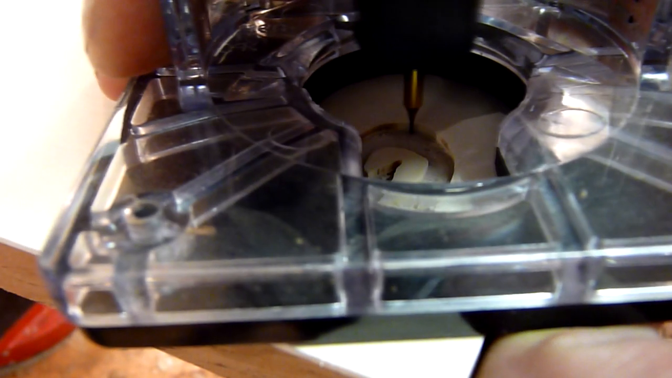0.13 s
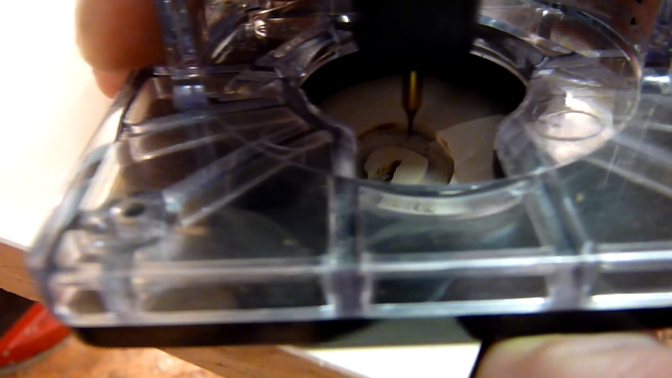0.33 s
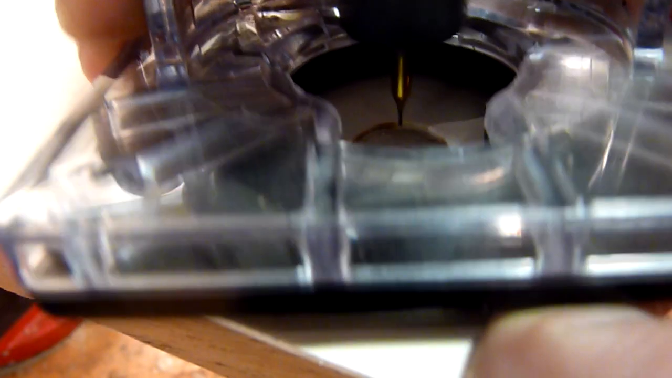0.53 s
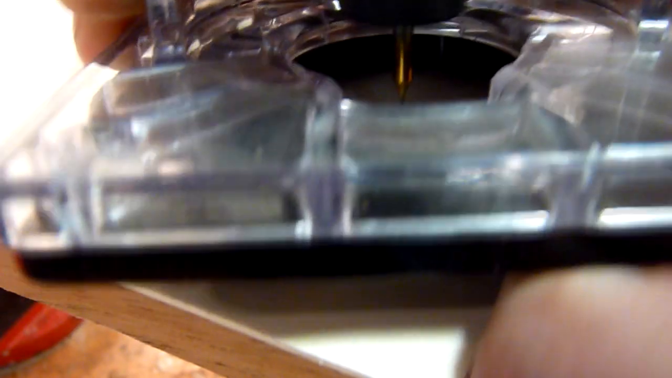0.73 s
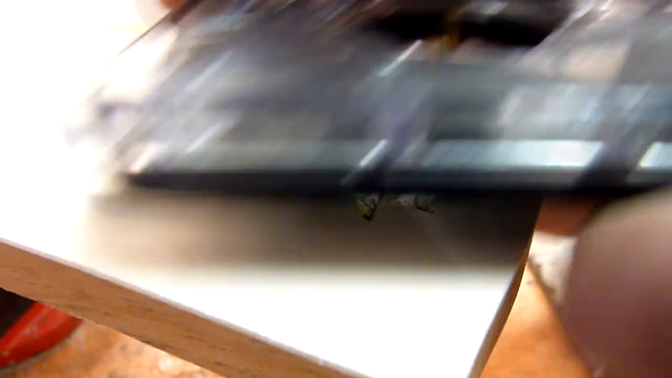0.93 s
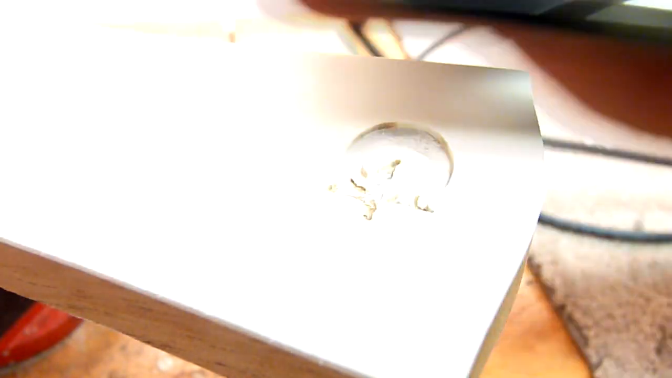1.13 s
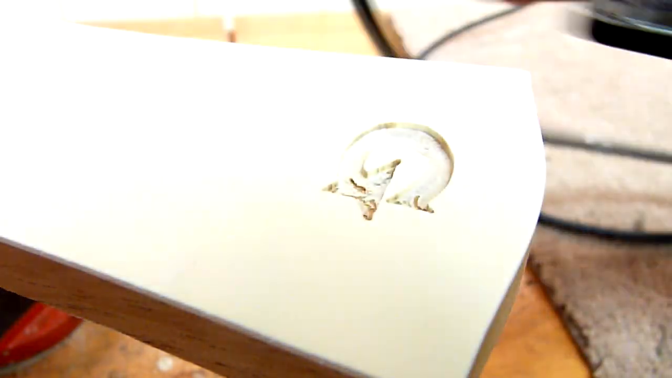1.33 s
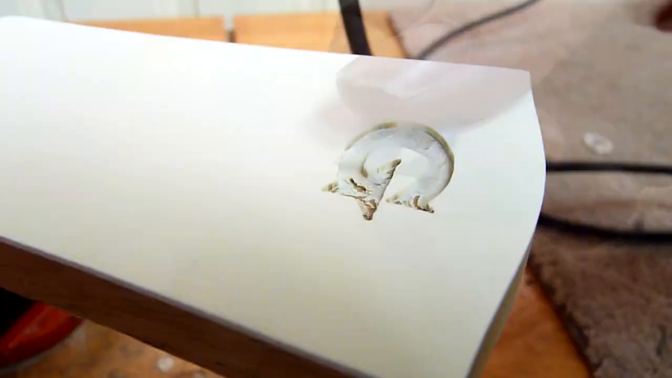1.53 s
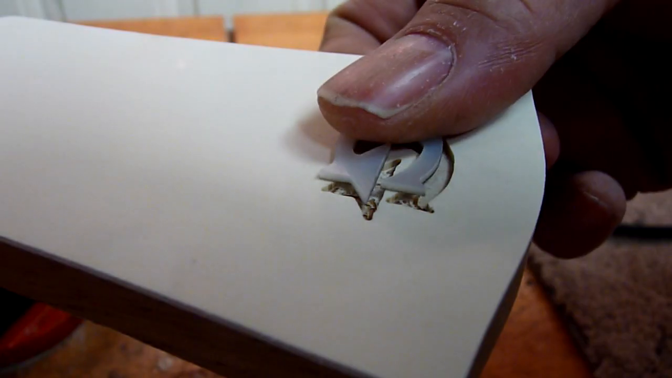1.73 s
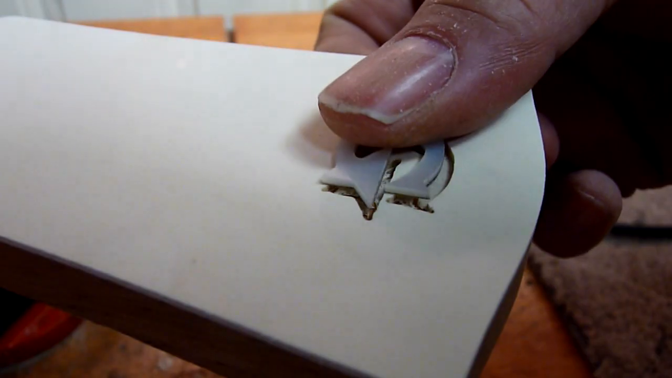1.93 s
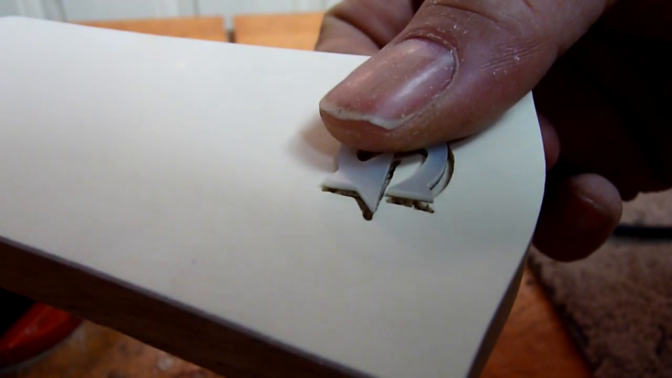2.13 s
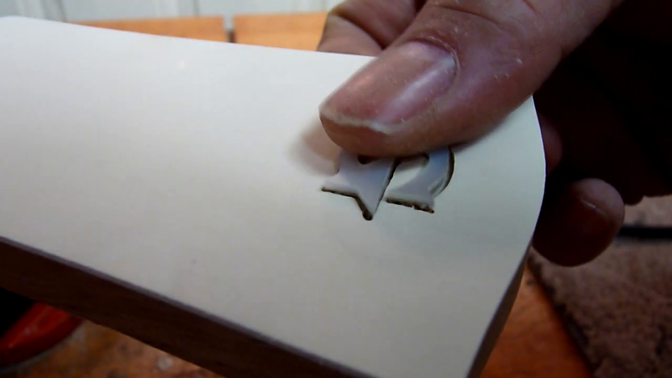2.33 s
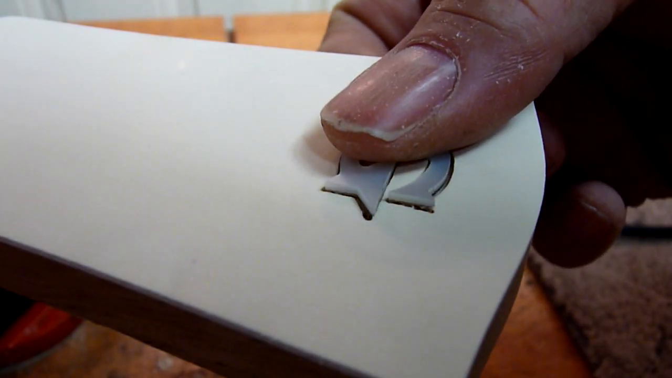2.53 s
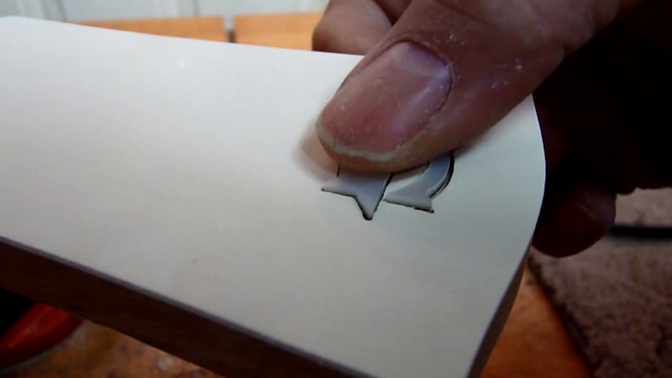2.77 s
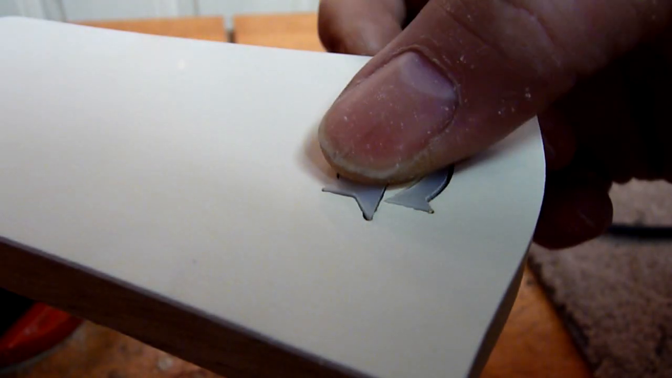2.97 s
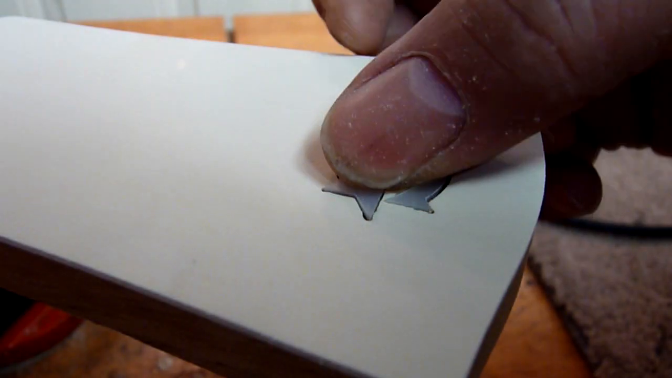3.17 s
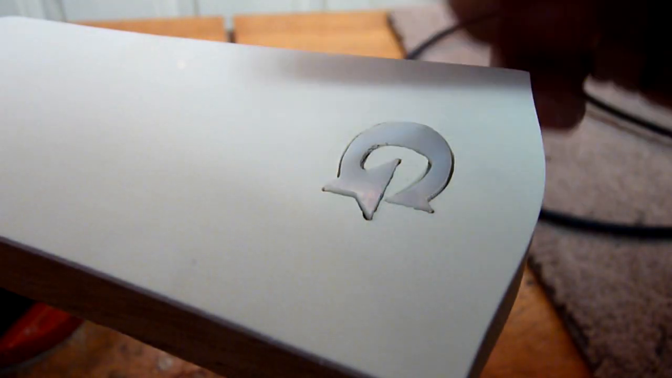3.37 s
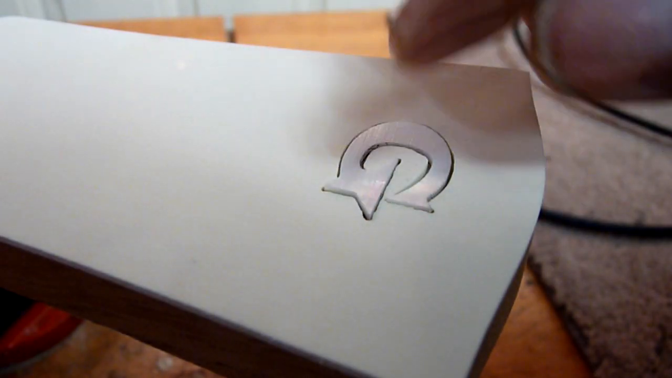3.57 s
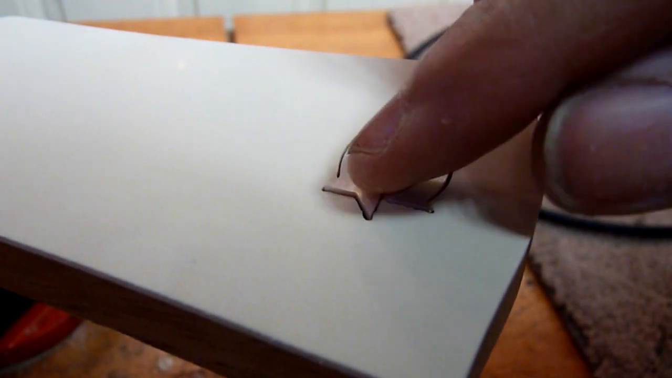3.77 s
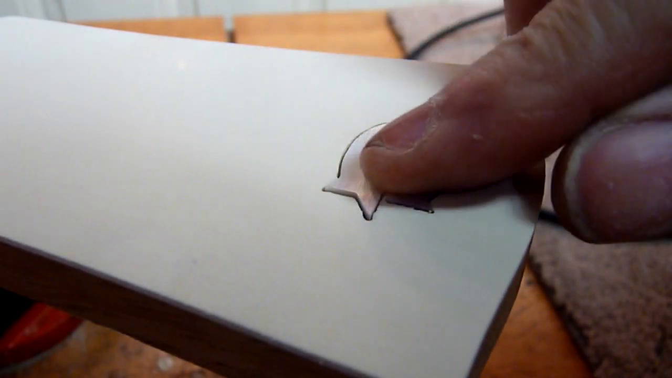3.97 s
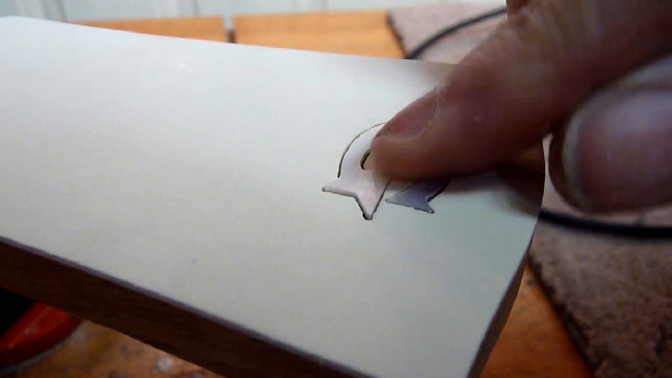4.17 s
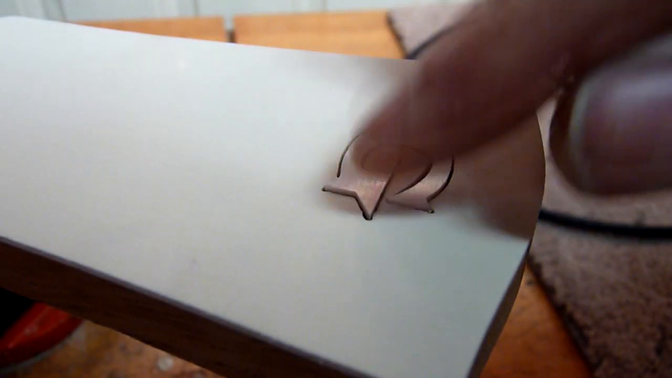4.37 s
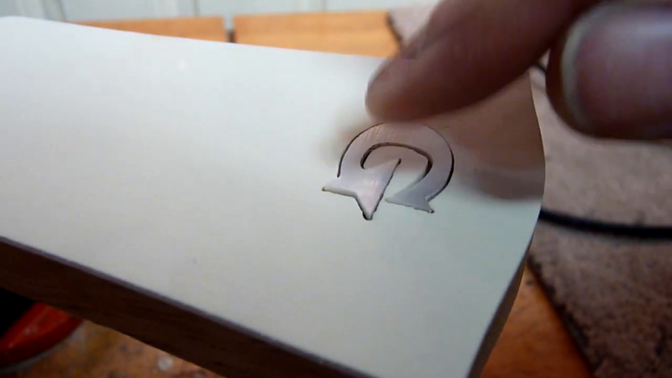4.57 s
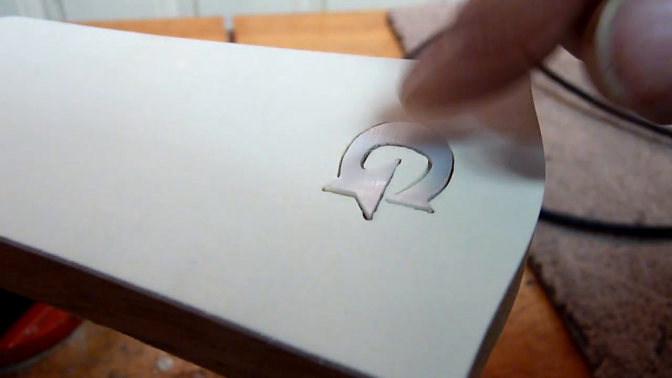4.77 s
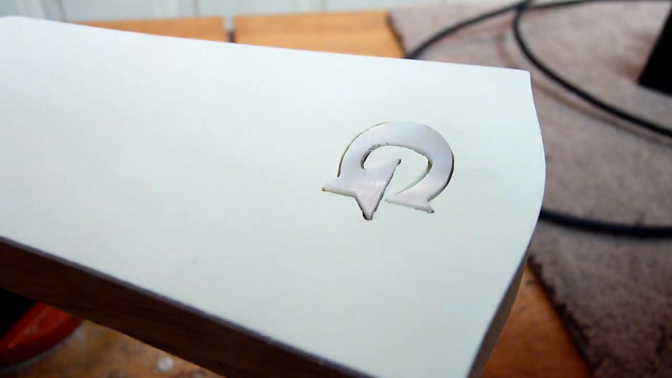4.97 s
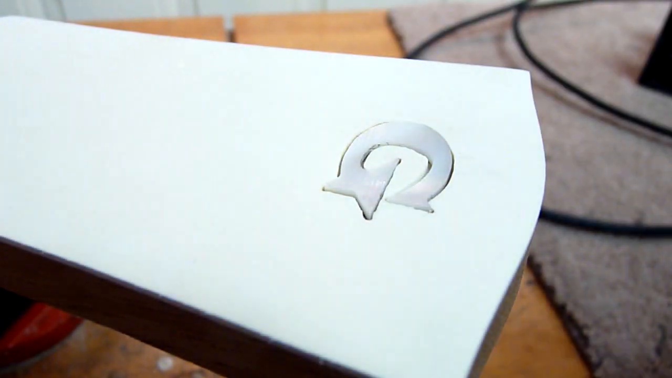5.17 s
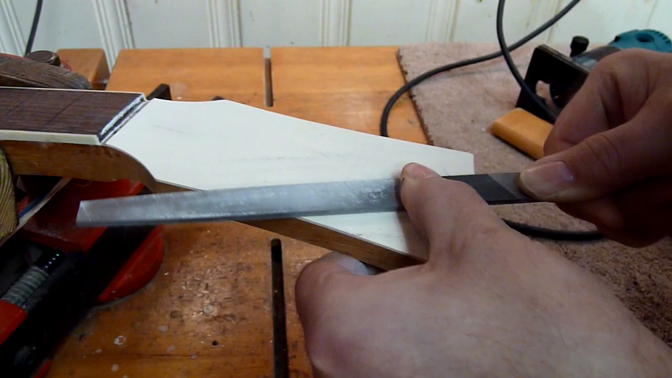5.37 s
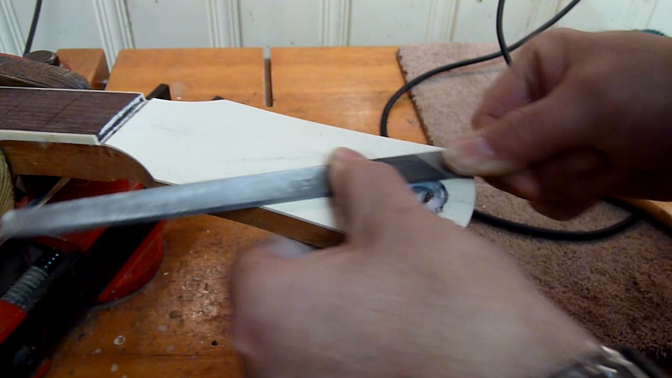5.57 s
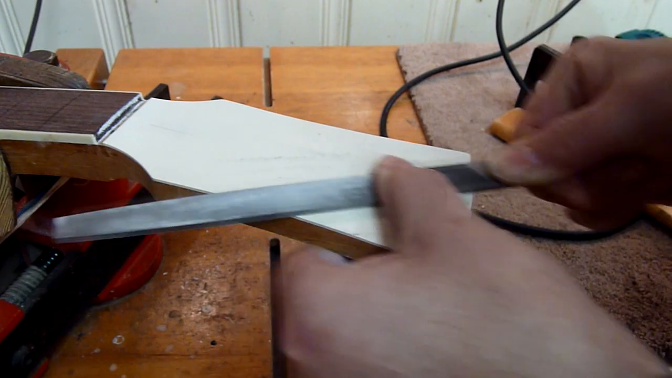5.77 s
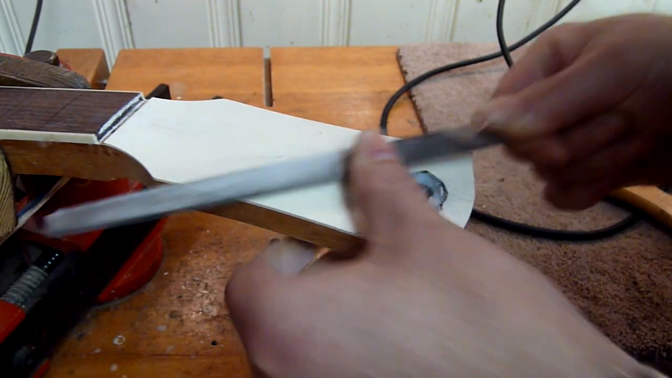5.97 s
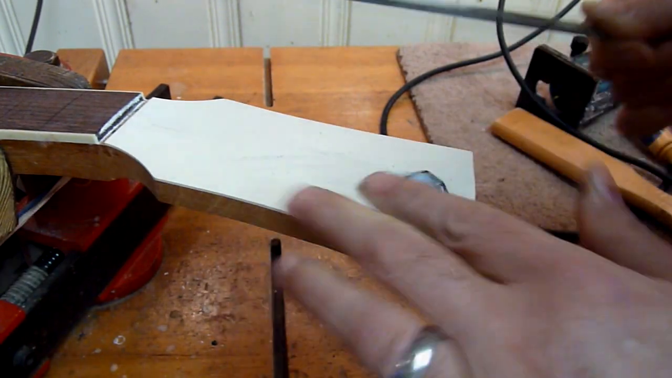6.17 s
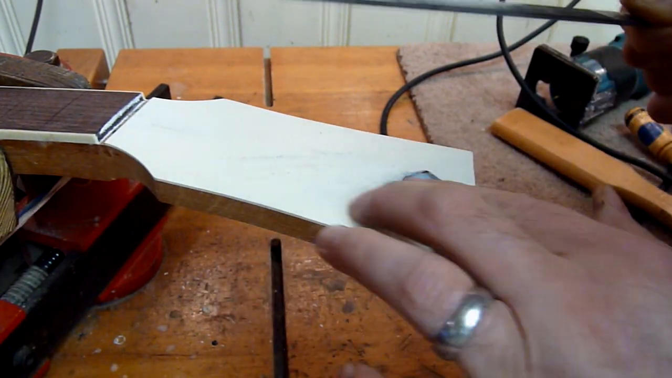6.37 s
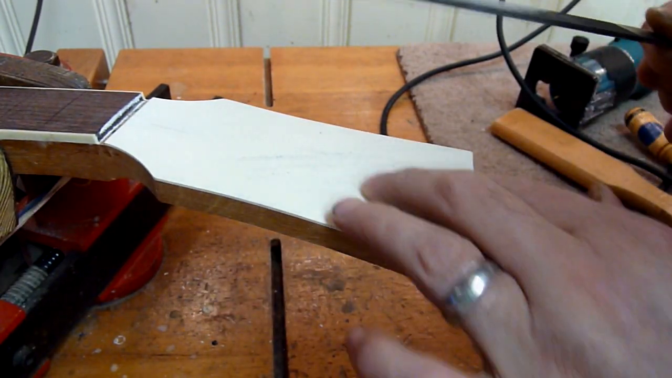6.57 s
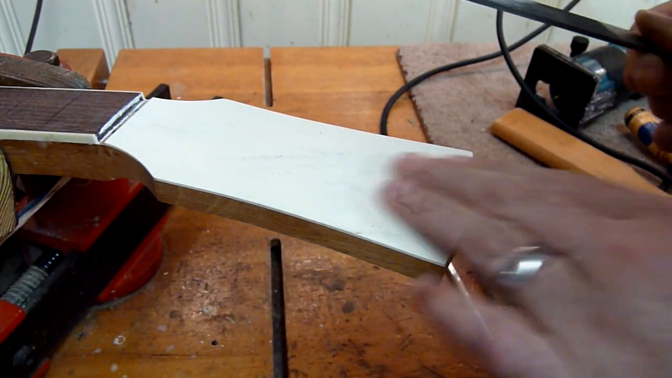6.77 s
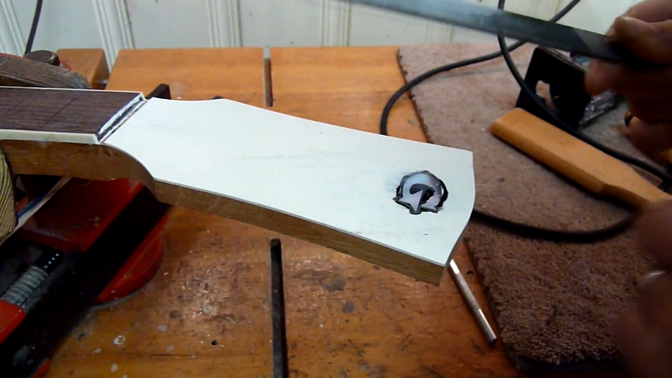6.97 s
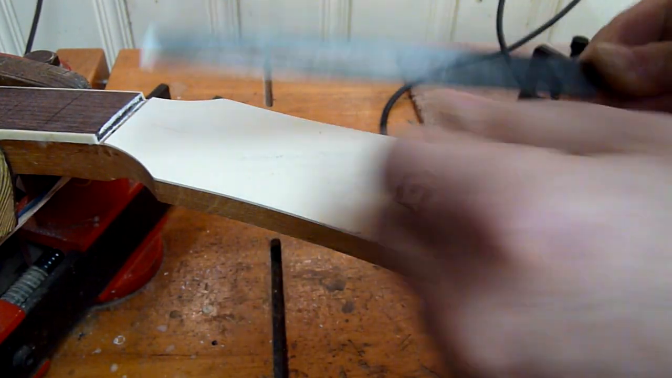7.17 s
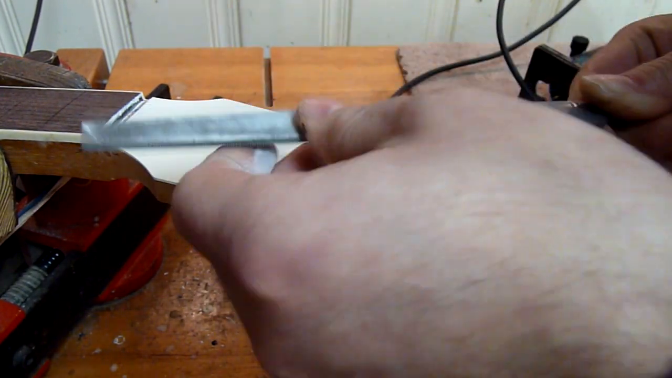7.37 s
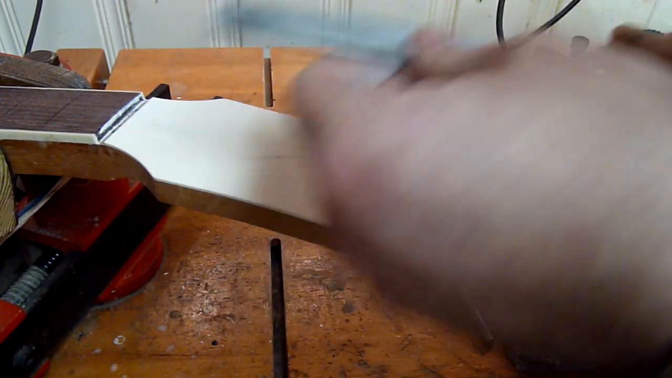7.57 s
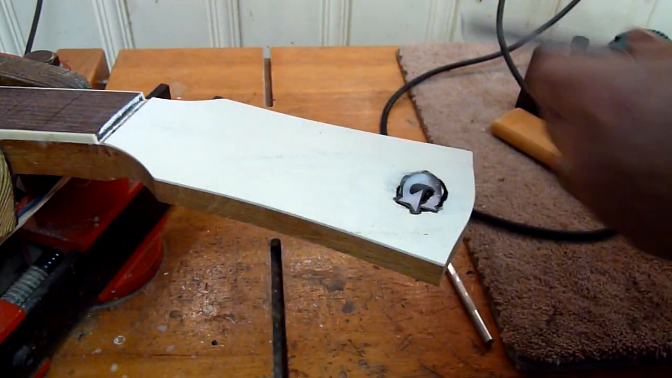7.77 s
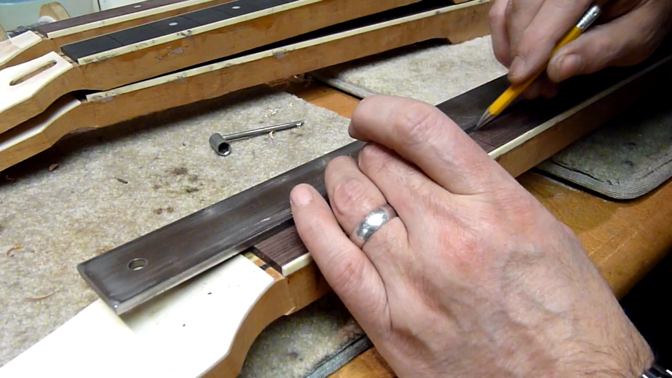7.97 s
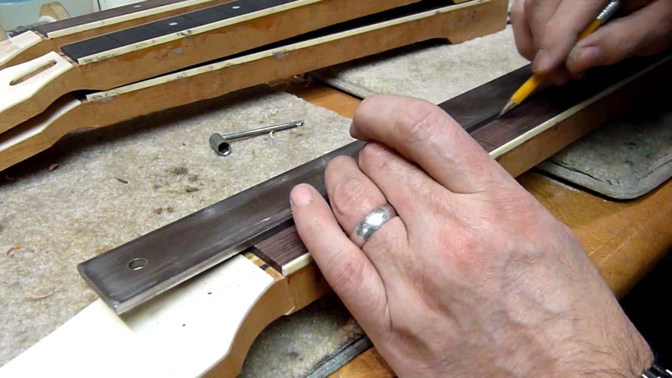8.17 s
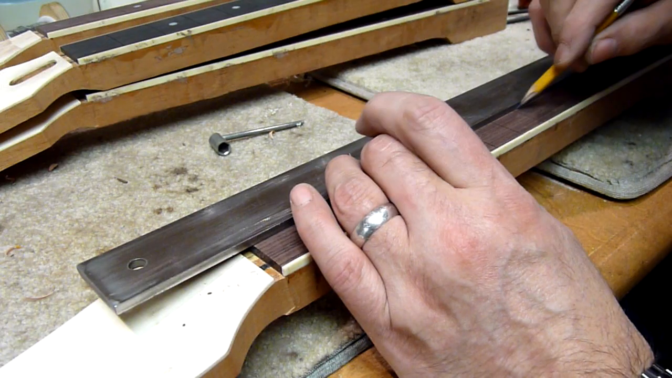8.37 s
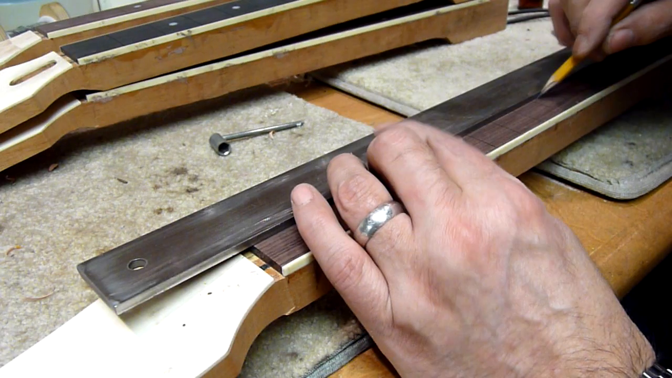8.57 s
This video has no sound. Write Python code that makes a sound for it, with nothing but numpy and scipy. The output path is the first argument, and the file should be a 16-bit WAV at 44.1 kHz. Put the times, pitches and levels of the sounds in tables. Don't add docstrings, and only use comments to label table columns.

```python
import sys
import numpy as np
from scipy import signal
from scipy.fft import rfft, irfft
from scipy.io import wavfile
from scipy.ndimage import uniform_filter1d

SR = 44100
rng = np.random.default_rng(int(sys.argv[2]) if len(sys.argv) > 2 else 0)


def log_audio(samples):
    frames = np.atleast_2d(samples).T
    limited = np.clip(frames, -1, 1)
    pcm = np.round(limited * 32767).astype(np.int16)
    wavfile.write(sys.argv[1], SR, pcm)


def convert_level_to_amplitude(level_db):
    exponent = np.asarray(level_db, float) / 20
    return 10 ** exponent


N = 379701
T = np.arange(N) / SR
HZ = np.fft.rfftfreq(512, 1 / SR)[:, None]
SEATED_S = 3


def evened(x):
    return x / np.sqrt(np.mean(x ** 2) + 1e-20)


def at(points, t):
    return np.interp(t, *np.transpose(points))


def read(points, hz):
    f, value = np.transpose(points)
    return np.interp(np.log(hz + 1), np.log(f + 1), value)


def curves(tables, t):
    s, *columns = np.concatenate(tables).T
    gate = sum((t >= rows[0][0]) & (t < rows[-1][0]) for rows in tables)
    return [np.interp(t, s, c) for c in columns], uniform_filter1d(gate * 1., size=200)


def drift(hz):
    return evened(signal.lfilter(*signal.butter(2, hz, fs=SR), rng.standard_normal(N)))


def grit(per_s, spread_db):
    size = convert_level_to_amplitude(spread_db * np.minimum(rng.exponential(1, N), 5)) * rng.standard_normal(N)
    return evened(size * (rng.random(N) < per_s / SR))


def resonate(x, hz, width):
    turn = np.exp(2j * np.pi * np.cumsum(hz * np.ones(len(x))) / SR)
    r = np.exp(-np.pi * width / SR)
    return 2 * (turn * signal.lfilter([1 - r], [1, -r], x / turn)).real


def two_pole(x, hz, width):
    r = np.exp(-np.pi * width / SR)
    return signal.lfilter([1, 0, -1], [1, -2 * r * np.cos(2 * np.pi * hz / SR), r * r], x)


def body(x, modes, wander_db):
    out = np.zeros(len(x))
    for k, (hz, width, db) in enumerate(modes):
        mode = (1 - np.exp(-np.pi * width / SR)) * two_pole(x, hz, width)
        out += (-1) ** k * convert_level_to_amplitude(db + wander_db * drift(2.8)) * mode
    return evened(out)


def shaped(x, gain):
    z = signal.stft(x, nperseg=512, noverlap=384)[2]
    return signal.istft(z * gain, nperseg=512, noverlap=384)[1][..., :N]


def pair(x, other, same, lr_db=0., lead=0.):
    same = np.clip(same, 0, 1)
    shared, apart = np.sqrt((1 + same) / 2), np.sqrt((1 - same) / 2)
    tilt = convert_level_to_amplitude(lr_db / 2) * np.exp(.5j * lead)
    both = np.array([x, other])
    left = shaped(both, np.array([shared * tilt, apart * tilt]))
    right = shaped(both, np.array([shared / tilt, -apart / tilt]))
    return np.array([left.sum(0), right.sum(0)])


FILE_CUT_S = 5.4195
# (time [s], pressure [dB], speed brightening the scrape [dB], flat contact thrumming the blank [dB])
STROKES = [
    [(5.42, -47, -0.5, -7), (5.43, -36, 2.5, -4.5), (5.47, -55, 3, -3)],
    [(5.47, -53.5, 3.5, -20), (5.502, -36, -0.5, -18.5), (5.574, -36, -0.5, -11.5), (5.63, -53.5, 6.5, 5.5)],
    [(5.63, -56, 8, -14), (5.656, -39, -2, -15), (5.75, -39.5, 3.5, -3.5), (5.795, -50, -1, -2)],
    [(5.795, -50.5, -15, -2.5), (5.819, -41, -1, -21), (5.897, -38, 2, -7.5), (5.987, -52.5, 1, -7),
     (6.02, -50, 0, -12)],
]


def pressure_db():
    after_s = np.maximum(T - STROKES[-1][-1][0], 0)
    pressed = np.maximum(curves(STROKES, T)[0][0] - 20 * after_s / 0.048, -180)
    return np.where(T > FILE_CUT_S, pressed, -180)


# (start time [s], level [dB])
SHOP = [
    (0, -54.5),
    (4.1, -54),
    (5.4, -53.5),
    (7.2, -53.5),
    (8.053, -53),
]
# (frequency [Hz], density [dB per Hz])
SHOP_COLOUR = [(15, -49.5), (25, -18), (49, -10.5), (109, -3.5), (194, -17), (260, -11), (511, -18),
               (1130, -20.5), (2280, -35), (2640, -31), (3120, -32.5), (4700, -33.5), (6280, -37),
               (8000, -45.5), (10400, -89.5), (17600, -120)]
# (frequency [Hz], likeness [0-1])
SHOP_SAME = [(170, .999), (480, 0.99), (1370, 0.72), (3900, 0.015), (8000, 0.08)]
# (frequency [Hz], level [dB rms])
HUM = [(59.5, -66), (119, -63), (238, -66.5)]
# (time [s], level re room tone [dB])
BENCH_DRONE = [(0, -38), (4.9, -36), (5.3, -7), (8.03, -7), (8.06, -36), (8.7, -31.5)]


def shop():
    starts, levels = np.transpose(SHOP)
    room = convert_level_to_amplitude(levels[np.searchsorted(starts[1:], T)])
    bench_rumble = convert_level_to_amplitude(pressure_db() - 22)
    level = uniform_filter1d(room + bench_rumble, size=4000)
    noise = evened(shaped(rng.standard_normal((2, N)), convert_level_to_amplitude(read(SHOP_COLOUR, HZ))))
    bass_cut = np.clip(np.fft.rfftfreq(N, 1 / SR) / 57.0, 0, 1) ** 3
    air = irfft(rfft(noise) * bass_cut, N)
    air += convert_level_to_amplitude(at(BENCH_DRONE, T)) * evened(resonate(air[0], 298, 147))
    hum = sum(convert_level_to_amplitude(db + 4 + 2.1 * drift(18.0)) * np.sin(2 * np.pi * hz * T + 0.27 * drift(2.4))
              for hz, db in HUM)
    rise = np.clip((T - 1.56) / 0.11, 0, 1)
    rise *= 1 - 0.68 * np.exp(-((T - 8.053) / .004) ** 2)
    rise *= np.clip(1 - 0.89 * np.exp(-((T - 5.418) / 0.0041) ** 2), .05, 1)
    return rise * (level * pair(*air, read(SHOP_SAME, HZ)) + hum)


# (time [s], level [dB], shaft speed [Hz])
COAST = [(1.6, -77, 494), (1.72, -50, 437), (1.84, -53, 406), (1.98, -56, 357), (2.2, -59.5, 312),
         (2.6, -72.5, 255), (3.0, -100, 199)]
# (frequency [Hz], density [dB per Hz])
COAST_COLOUR = [(180, -26.5), (300, -18), (330, -31), (423, -1), (2140, -12), (2590, -12), (3280, -8),
                (6510, -9), (8000, -20.5), (10400, -53), (17600, -120)]


def wind_down():
    (db, hz), gate = curves([COAST], T)
    a, b = rng.standard_normal((2, N))
    orders = sum(convert_level_to_amplitude(order_db) * evened(resonate(a, k * hz, 23. * k))
                 for k, order_db in [(2, -14), (4, -11), (8, -6), (10, -17), (13, -22.0)])
    colour = convert_level_to_amplitude(read(COAST_COLOUR, HZ))
    housing = convert_level_to_amplitude(-6.5) * evened(resonate(a, 2157.0, 59.0))
    sliding = convert_level_to_amplitude(-7.0) * evened(resonate(a, 4760.0 + hz, 200.))
    x = evened(shaped(a, colour)) + orders + housing + sliding
    return gate * convert_level_to_amplitude(db) * pair(x, evened(shaped(b, colour)), 0.48 + 0 * HZ, -2.8)


# (time [s], length [s], level [dB], first pitch [Hz], last pitch [Hz])
SCUFFS = [(2.434, 0.016, -52.5, 1100, 900), (3.32, .06, -71.5, 4240, 4200), (4.209, .08, -67, 6270, 6200),
          (5.995, 0.088, -49.5, 1090, 835), (6.003, 0.065, -48, 371, 347), (6.593, 0.11, -73, 1800, 1780),
          (6.68, 0.078, -62, 1380, 1230), (6.875, 0.057, -56, 1800, 1680), (6.895, .03, -61.5, 2140, 2100),
          (7.079, 0.073, -63, 1090, 900), (8.212, .018, -53.5, 1500, 1390), (8.418, 0.047, -60, 1820, 1820),
          (8.424, 0.0164, -64, 1500, 1400), (8.435, 0.043, -60, 1260, 1200), (8.6, .01, -53.5, 1500, 1400)]
SINGS = [(5.422, 0.022, -49, 3490, 3450), (5.5, 0.093, -56, 1300, 1310), (5.51, 0.1, -40.5, 3770, 3760),
         (5.53, 0.063, -40, 1900, 1820), (5.65, 0.12, -51.5, 5100, 5000), (5.69, .09, -44, 1920, 1740),
         (5.72, .06, -47.5, 643, 596), (5.57, .05, -49, 1350, 1250), (5.65, 0.046, -50, 1500, 1450),
         (5.7, 0.093, -49.5, 1260, 1233), (5.8, 0.17, -44.5, 1796, 1823), (5.83, 0.17, -51.5, 3770, 3800),
         (5.85, 0.074, -64, 1260, 1240), (5.99, 0.11, -56, 5730, 5750), (6.0, .03, -64, 1800, 1800),
         (6.19, 0.058, -67.5, 3740, 3750), (6.34, .14, -82, 6900, 6900), (8.213, 0.018, -60, 4150, 4100),
         (4.55, .07, -71, 3970, 3880), (4.58, .06, -72, 3150, 3100), (6.49, .04, -76, 3800, 3780),
         (8.39, 0.058, -62.5, 1850, 1840), (6.6, .13, -70.5, 6800, 6600), (6.63, 0.077, -69.5, 1800, 1800),
         (6.83, 0.078, -56, 6800, 6800), (6.86, 0.065, -66.5, 5900, 5860), (6.9, 0.034, -53.5, 2170, 2200),
         (6.9, 0.027, -56, 1800, 1763), (6.92, 0.083, -68, 2200, 2200), (5.68, .05, -46, 1800, 1800)]


def scuffs(rows, share):
    out = np.zeros(N)
    for s, length, db, first_hz, last_hz in rows:
        n = round(length * SR)
        drag = resonate(rng.standard_normal(n), np.linspace(first_hz, last_hz, n), share * first_hz)
        out[round(s * SR):][:n] += convert_level_to_amplitude(db + 3.0) * evened(drag) * np.hanning(n)
    return out


def contact(s, db, rise, hold, fall):
    away_db = 20 * np.maximum((s - T) / max(rise, .002), (T - s - hold) / max(fall, .002))
    return convert_level_to_amplitude(db - np.clip(away_db, 0, 200))


# (contact time [s], hiss [dB], rise [s per 20 dB], hold [s], fall [s per 20 dB])
RUBS = [(4.235, -67, .05, 0.032, .09), (4.576, -67, .04, 0.0014, .11), (4.804, -67.5, .015, 0, .09),
        (5.088, -59.5, 0.12, 0.19, .1), (6.1, -58.5, 0.23, 0, 0.13), (6.195, -61.5, .01, 0, 0.089),
        (6.259, -60.5, .01, 0.015, 0.099), (6.366, -70, .05, .1, .05), (6.47, -62.5, .01, 0, .08),
        (6.596, -66, 0.017, .11, .1), (6.825, -60, 0.072, 0.025, .1), (6.898, -52.5, 0.063, 0.009, .063),
        (7.358, -67, .05, 0, .022), (8.029, -66.5, 0.16, 0.0082, .02)]
# (frequency [Hz], level [dB])
SKIN = [(500, -10.5), (1000, 5), (2000, -0.5), (3500, 0.5), (5000, 4.5), (6500, -2), (8000, -5.5)]
# (frequency [Hz], width [Hz], level [dB])
STEEL = [(1800, 52, -4), (2290, 23, 4), (3760, 53, -16), (5830, 280, 3), (6800, 54, -2.5)]


def rubbing():
    db = 20 * np.log10(sum(contact(*row) for row in RUBS))
    ring_db = -7 + 0.65 * (db + 63.5)
    slips = grit(12000., 1.0)
    steel = ((T > 6) & (T < 7.1)) * convert_level_to_amplitude(ring_db) * body(slips, STEEL, 2.)
    colour = convert_level_to_amplitude(read(SKIN, HZ))
    x = evened(shaped(slips, colour)) + steel
    other = evened(shaped(grit(11980.0, 1.5), colour))
    return convert_level_to_amplitude(db + 6.0) * pair(x, other, .5 + 0 * HZ)


# (frequency [Hz], width [Hz], level [dB])
FILE = [(1280, 70, -6), (1500, 60, 0), (1816, 79, -0.5), (3200, 90, -14.5), (3770, 82, 0.5),
        (5310, 710, -12.5), (6700, 200, -4)]
# (frequency [Hz], width [Hz], level [dB])
BLANK = [(308, 150, -19), (576, 16, 9.5), (1030, 130, -22)]
# (frequency [Hz], density [dB per Hz])
TEETH = [(88, -39), (150, -37), (577, -7), (875, -21), (1820, -11), (2580, -9), (3780, -9), (8000, -13),
         (10400, -58), (17600, -120)]


def filing():
    _, bite_db, thrum_db = curves(STROKES, T)[0]
    slips = grit(7000., 2.1) * convert_level_to_amplitude(1.5 * drift(130.) + .5 * drift(25.))
    scrape = evened(shaped(slips, convert_level_to_amplitude(read(TEETH, HZ))))
    treble = evened(shaped(scrape + body(slips, FILE[3:], 0.5), HZ > 2600))
    x = 0.61 * body(slips, FILE[:3], 0.5) + 0.61 * shaped(scrape, HZ <= 2600)
    x += convert_level_to_amplitude(bite_db - 1.0) * treble
    x += 2 * convert_level_to_amplitude(-11) * evened(resonate(slips, 1050., 1100))
    x += convert_level_to_amplitude(thrum_db) * body(slips, BLANK, 1.8)
    x *= convert_level_to_amplitude(pressure_db() - 1.0)
    return (T > FILE_CUT_S) * pair(x, np.roll(x, 900), 0.86 + 0 * HZ)


# (time [s], level [dB], frequency [Hz], t60 [s])
KNOCKS = [
    (4.482, -44, 211, 0.12),
    (4.714, -33, 211.7, 0.082),
    (6.247, -45, 192.4, 0.57),
    (6.907, -31.5, 226.3, 0.085),
    (6.908, -38.5, 199.3, 0.67),
    (7.279, -41.5, 251, 0.064),
]


def knocks():
    out, t = np.zeros(N + 22050), np.arange(22050) / SR
    for s, db, hz, t60 in KNOCKS:
        tone = convert_level_to_amplitude(db - 60 * t / max(t60, .02)) * np.sin(2 * np.pi * hz * t)
        out[round(s * SR):][:len(t)] += tone * np.minimum(t / 0.001, 1)
    return out[:N]


# (time [s], tick [dB], tick
# frequency [Hz], body [dB], ring frequency [Hz])
CLICKS = [(2.4444, -41.5, 6000, -32.5, 995), (2.8227, -47.5, 4400, -44, 1052),
          (2.8699, -59, 6040, -38, 738), (3.342, -52, 4190, -50, 785), (4.4821, -69, 4220, -39, 675),
          (4.7112, -38.5, 4450, -42.5, 1320), (5.3818, -72.5, 3740, -40.5, 637),
          (5.4239, -34.5, 6300, -42, 576), (6.043, -35.5, 4797, -48.5, 1010), (6.0929, -41, 7220, -62, 652),
          (6.1914, -53.5, 3800, -57.5, 633), (6.259, -41, 4130, -51, 630), (6.2976, -46.5, 3320, -52, 900),
          (6.402, -50.5, 3230, -53, 589), (6.4688, -48, 5100, -56.5, 750), (6.5776, -61, 5730, -59.5, 900),
          (6.9697, -48.5, 3120, -53.5, 664), (7.355, -56, 3620, -55.5, 540),
          (8.2133, -40, 4180, -54.5, 1450), (8.4285, -52.5, 3500, -51, 1500),
          (8.604, -61, 3760, -52.5, 1474), (5.4804, -52, 3710, -61, 900), (5.516, -41.5, 3910, -42.5, 1320),
          (5.614, -46, 6000, -55, 900), (5.6461, -43, 5090, -56.5, 900), (5.713, -46, 3700, -32.5, 1800),
          (5.8167, -42, 5480, -53, 1000), (5.975, -50.5, 5820, -60.5, 900), (6.0938, -43.5, 3300, -63, 900),
          (6.052, -45.5, 7010, -59, 900), (6.263, -53, 6410, -63.5, 900), (8.419, -56.5, 5900, -62.5, 1200),
          (5.527, -46, 3500, -42, 700), (5.555, -46, 5200, -41.5, 1960), (5.578, -47.5, 3700, -44, 1700),
          (5.742, -47, 6000, -42, 650), (5.748, -48, 3600, -43, 1290), (5.892, -43.5, 6500, -43, 1900),
          (8.4256, -55, 6000, -54.5, 1800), (2.8769, -66.5, 4000, -51, 1660), (6.909, -47, 6000, -48, 2160),
          (6.887, -55.5, 5000, -48, 990), (8.2185, -55.5, 5070, -53, 1410), (8.433, -58.5, 3200, -55, 1290),
          (6.909, -45.5, 6700, -42, 1600), (7.5, -56, 5000, -47.5, 1000),
           (8.2185, -53.5, 5100, -53.5, 1460), (8.433, -60, 3700, -53.5, 1300)]
# (frequency [Hz], level [dB], t60 [s], follows body 0 or tick 1)
INLAY = [(1500, -2, 0.034, 0), (2200, -15, 0.013, 0.16), (4180, 7.5, 0.024, 0.97), (6260, -3, 0.015, 0.78)]


def clicks():
    touches = CLICKS
    out, t = np.zeros((2, N + 22050)), np.arange(22050) / SR
    noise = rng.standard_normal((len(touches), 3, len(t)))
    noise[:, :2, 20] += 7.0
    for (s, tick_db, tick_hz, body_db, hz), (a, b, c) in zip(touches, noise):
        loose = s < SEATED_S
        tail_db, crack_width, thud_db, thud_top = (-10.5, 440, 6, 2350.) if loose else (-19.5, 1320, 7, 2.03 * hz)
        crack = two_pole(np.array([a + 0.4 * c, a - 0.44 * c]), tick_hz, crack_width)
        thud = signal.lfilter(*signal.butter(3, [220., thud_top], "band", fs=SR), b)
        ring = convert_level_to_amplitude(0.5 - 60 * t / 0.025) * np.sin(2 * np.pi * hz * t)
        ring += convert_level_to_amplitude(tail_db - 60 * t / 0.2) * evened(resonate(c, hz, 90.))
        if loose:
            for f, db, t60, bright in INLAY:
                mode_db = db + bright * (tick_db - body_db)
                ring += convert_level_to_amplitude(mode_db - 60 * t / t60) * np.sin(2 * np.pi * f * t)
        if loose or 4.4 < s < 4.6 or s > 8.2:
            u = (t - .001) / 0.00019
            ring += convert_level_to_amplitude(5) * u * np.exp(.5 - u ** 2 / 2)
        ring += convert_level_to_amplitude(2.5 - 60 * t / 0.015) * np.sin(2 * np.pi * 323.0 * t)
        edge = convert_level_to_amplitude(-1.5 - 60 * t / 0.011) * np.diff(c, prepend=0)
        fall = convert_level_to_amplitude(-60 * t / 0.011) + convert_level_to_amplitude(-6.5 - 60 * t / 0.046)
        click = convert_level_to_amplitude(tick_db - 14.5) * (fall * crack + edge)
        click += convert_level_to_amplitude(body_db) * (convert_level_to_amplitude(thud_db - 60 * t / 0.053) * thud + ring)
        lr_db = -6.5 * (6 < s < 7)
        balance = convert_level_to_amplitude([[lr_db / 2], [-lr_db / 2]])
        out[:, round(s * SR):][:, :len(t)] += click * np.minimum(t / 0.001, 1) * balance
    return out[:, :N]


# (time [s], air roar [dB], base seated on the blank [0-1], fan outlet aimed at the ports [dB])
ROUTER = [
    (0, -34, 0.85, 0.5),
    (.3, -34, 0.83, 0),
    (.55, -34, 0.87, 3.5),
    (.85, -33.5, 0.61, 0.5),
    (1.1, -32, 0.17, -1.5),
    (1.24, -34, 0, -1),
    (1.35, -35.5, 0.03, -6.5),
    (1.44, -36.5, 0.32, -1.5),
    (1.6, -38.5, 0.31, -3),
    (1.74, -38, 0.63, -34),
]
# (time [s], lifted away [0-1])
LIFT = [
    (0, 0.05),
    (.95, 0.07),
    (1.2, 0.54),
    (1.74, 1),
]
# (multiple [-], level re blade tone [dB]; the last, top order stands on a level of its own)
ORDERS_DB = [(2, -11), (3, -24), (4, -9), (7, -10.5), (11, -18), (12, -17.5), (16, -12.5)]
# (frequency [Hz], level [dB])
ROAR = [(40, -31), (110, -17), (220, -16), (400, -10), (900, -13), (2000, 1.5), (3200, 3), (4200, 4),
        (5000, 0), (6500, -2.5), (8000, -6.5)]
ROAR_AWAY = [(40, -60.5), (110, -43), (220, -20), (400, -18.5), (900, -12), (2000, -7), (3200, 1.5),
             (4200, 4), (5000, 2), (6500, -5.5), (8000, -11.5)]
# (frequency [Hz], width [Hz], level [dB])
BOOM = [(700, 292, 0), (950, 320, 1.5), (1230, 117, 5), (1660, 44, -0.5), (1904, 200, 1), (1496, 182, 0.5)]
BOOM_AWAY = [(790, 300, 4), (1320, 96, 5), (2170, 146, -0.5), (1100, 73, -0.5)]
# (time [s], level re roar [dB])
PRESSED = [(0, -5), (.12, -3.5), (.25, -2.5), (.45, -3.5), (.6, -5), (.95, -8.5), (1.1, -15.5)]
# (time [s], level above 4.7 kHz [dB])
OUTLET = [(0, 0), (.5, 0), (.75, 2.5), (1.05, 2.5), (1.25, -0.5), (1.74, 0)]
# (time [s], level [dB])
BEAM = [(0, -3), (.95, -1), (1.13, 9), (1.26, 15.5), (1.35, 10), (1.74, 11)]
# (frequency [Hz], likeness [0-1])
ROUTER_SAME = [(60, 1), (140, 1), (340, 0.96), (810, 1), (1940, 0.87), (4640, 1), (11100, 0.19)]
# (frequency [Hz], left over right [dB])
NEAR_LR = [(500, -1), (1000, -0.5), (2000, -3.5), (3000, -0.5), (3700, -2.5), (4500, 1.5), (6000, -3.5),
           (7500, -5)]
AWAY_LR = [(800, -1), (1200, -5.5), (1600, -5), (2200, -7.5), (3500, -13.5), (5000, -9), (6500, -13.5),
           (7500, -8)]
# (frequency [Hz], left leads by [radians])
NEAR_LEAD = [(300, 0.26), (2000, -0.12), (2900, 2), (3700, -0.14), (4200, 0.66), (5000, 0.7), (7000, -0.35),
             (8000, 2.3)]
AWAY_LEAD = [(300, 0), (1500, 0.5), (2000, 1.16), (4200, 1.5), (5000, 0.9), (6300, 1.1), (7500, -3.8)]


def router():
    (level_db, seated, aim_db), gate = curves([ROUTER], T)
    roar_db = level_db + 20 * np.log10(np.clip((1.729 - T) / 0.12, 1e-4, 1))
    boom_db = -2.5 + 10 * seated
    shaft_db = roar_db + 1.17 * (level_db + 34.5) - 14 + 12.5 * seated
    blade_db = roar_db + aim_db
    outlet_db, away = at(OUTLET, T), at(LIFT, T)
    frame_s = np.arange(N // 128 + 2) * 128 / SR
    lifted = at(LIFT, frame_s)

    def blend(near, far):
        return read(near, HZ) + lifted * (read(far, HZ) - read(near, HZ))

    air = rng.standard_normal((2, N)) * convert_level_to_amplitude(0.42 * drift(110.0))
    hiss_db = (HZ > 4700) * at(OUTLET, frame_s)
    roar = evened(shaped(air, convert_level_to_amplitude(blend(ROAR, ROAR_AWAY) + hiss_db)))
    boom = np.array([np.sqrt(1 - away) * body(a, BOOM, .5) + np.sqrt(away) * body(a, BOOM_AWAY, .5)
                     for a in air[:, ::-1]])
    boom = shaped(boom, np.clip(HZ / 680.0, 0, 1) ** 2)
    drone = np.array([evened(resonate(a, 957, 120)) for a in air])
    noise = convert_level_to_amplitude(roar_db + 8.0) * (roar + convert_level_to_amplitude(boom_db - 9.0) * boom)
    noise += convert_level_to_amplitude(roar_db + 4 + at(PRESSED, T)) * drone

    turns = 2 * np.pi * np.cumsum(522.85 + 0.38 * drift(30.)) / SR
    tones = convert_level_to_amplitude(shaft_db + 5.0 + 0.98 * drift(22.6)) * np.sin(turns)
    tones += convert_level_to_amplitude(blade_db + 8.0 + 0.78 * drift(24.83)) * np.sin(8 * turns)
    for k, db in ORDERS_DB[:-1]:
        order_db = blade_db + db + (k > 10) * 3.2 * outlet_db
        tones += convert_level_to_amplitude(order_db + 0.94 * drift(6.7)) * np.sin(k * turns)
    tones += convert_level_to_amplitude(shaft_db - 15.0) * np.sin(turns - 2 * np.pi * 120 * T)
    out = pair(noise[0] + tones, noise[1], read(ROUTER_SAME, HZ),
               blend(NEAR_LR, AWAY_LR), blend(NEAR_LEAD, AWAY_LEAD))
    k, db = ORDERS_DB[-1]
    left = (.7 - 0.59 * away) * np.sin(k * turns + 3.17 - 2.0 * away)
    high = convert_level_to_amplitude(db - 32.0 + at(BEAM, T)) * np.array([left, np.sin(k * turns)])
    return gate * (out + high * convert_level_to_amplitude(np.minimum(roar_db + 36.0, 0)))


def scene():
    drags = scuffs(SCUFFS, 0.049) + scuffs(SINGS, 0.019)
    return shop() + wind_down() + drags + rubbing() + filing() + knocks() + clicks() + router()


# (zero [Hz], pole [Hz])
NOTCH_HZ = [(2607, 2510), (4607, 4607), (5427, 5427), (7903, 8000)]
# (width [Hz], depth [dB])
NOTCHES = [(390, -29), (470, -35), (230, -28), (110, -33)]
# (frequency [Hz], level [dB])
MIRROR = [(7000, 0), (7400, -2), (7750, -7.5), (8000, -4), (8250, -11), (8600, -7.5), (9700, -17),
          (10500, -25), (11800, -36.5), (13000, -52)]


def camera(dry):
    size = 441 * (N // 441 + 9)
    rate = size * 160 // 441
    hz = np.fft.rfftfreq(size, 1 / SR)[:rate + 1]
    z = rfft(dry, size)[:, :rate + 1] * (hz < 8500)
    z = z + np.conj(z[:, ::-1])
    for (zero, pole), (width, db) in zip(NOTCH_HZ, NOTCHES):
        for f, sign in ((hz, 1), (hz - hz[-1], -1)):
            z = z * (1j * (f - sign * zero) + width * convert_level_to_amplitude(db)) / (1j * (f - sign * pole) + width)
    return irfft(z * convert_level_to_amplitude(read(MIRROR, hz)) * (hz < 13000), size)[:, :N]


def top_cut(x):
    return signal.sosfilt(signal.butter(12, 12280, fs=SR, output="sos"), x)


def record(dry):
    mix = camera(dry)
    return top_cut(mix)


dry = scene()
out = record(dry)
log_audio(out)
```